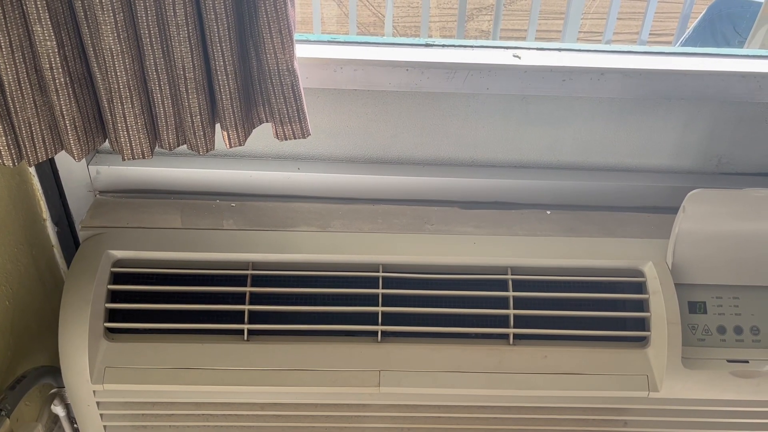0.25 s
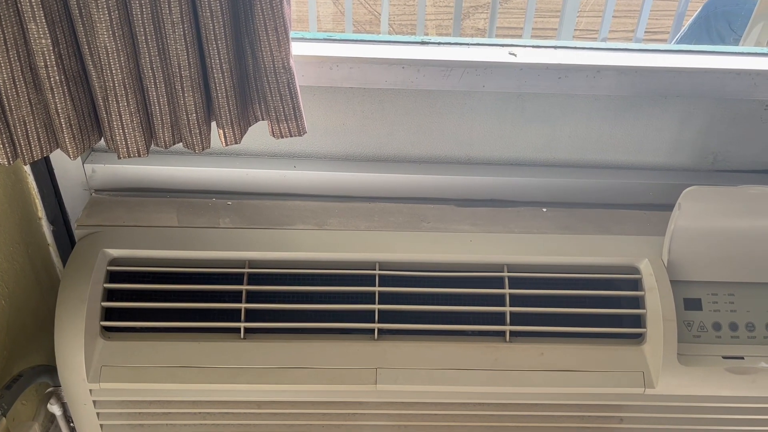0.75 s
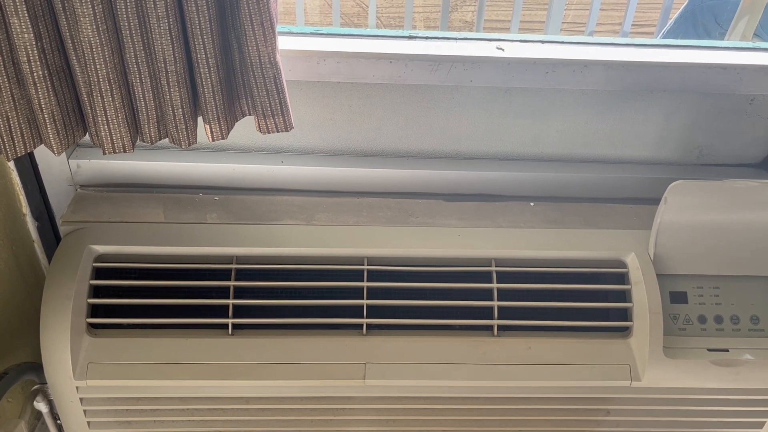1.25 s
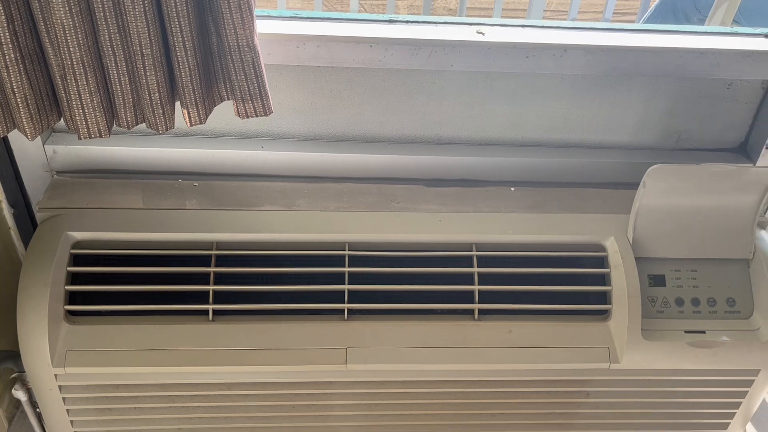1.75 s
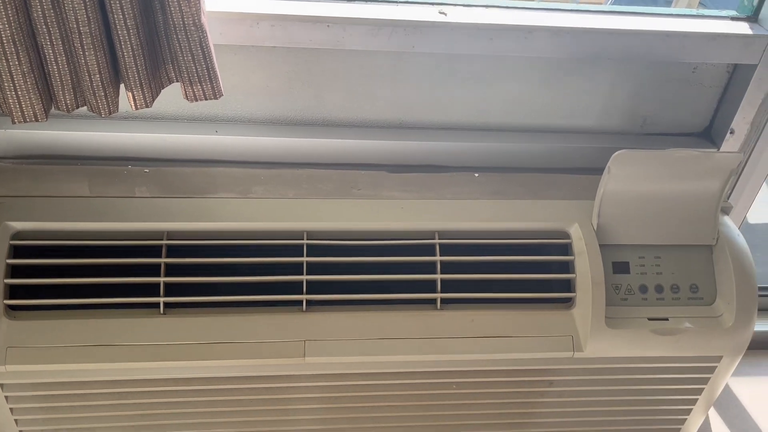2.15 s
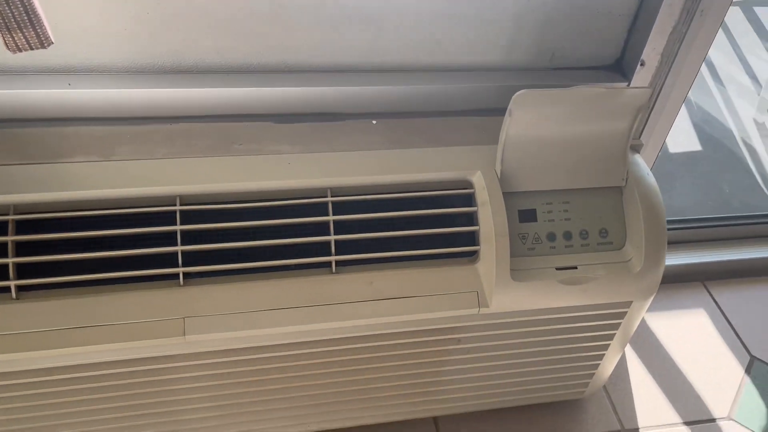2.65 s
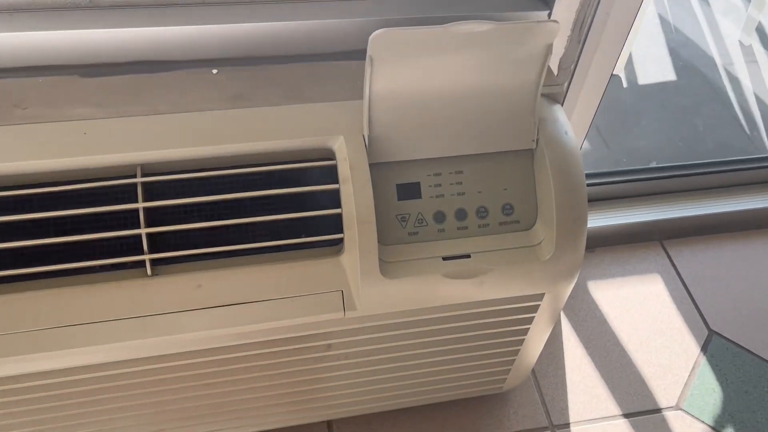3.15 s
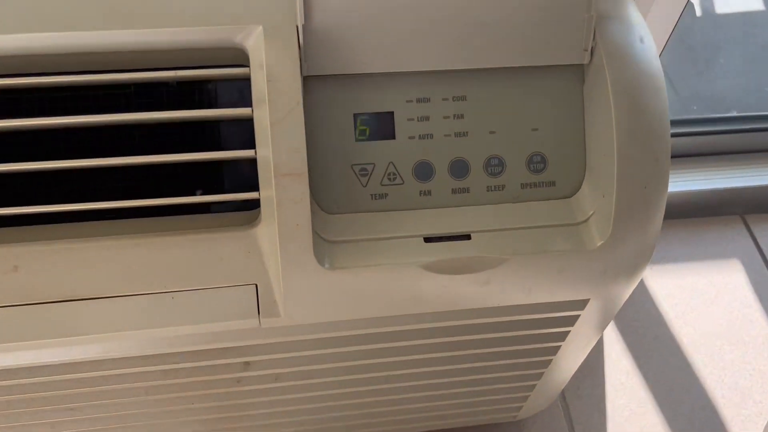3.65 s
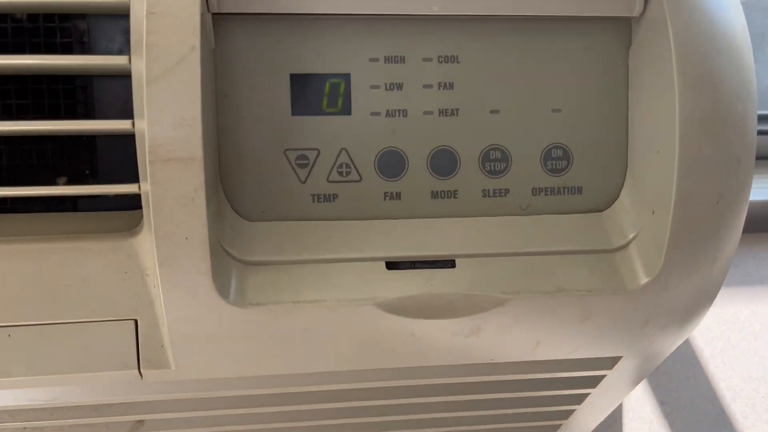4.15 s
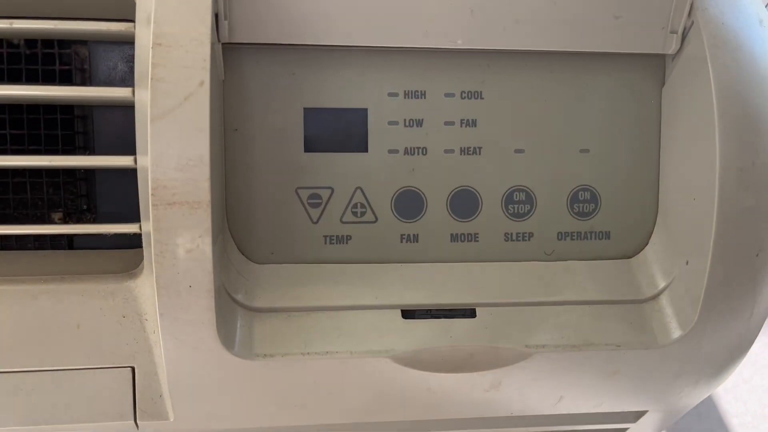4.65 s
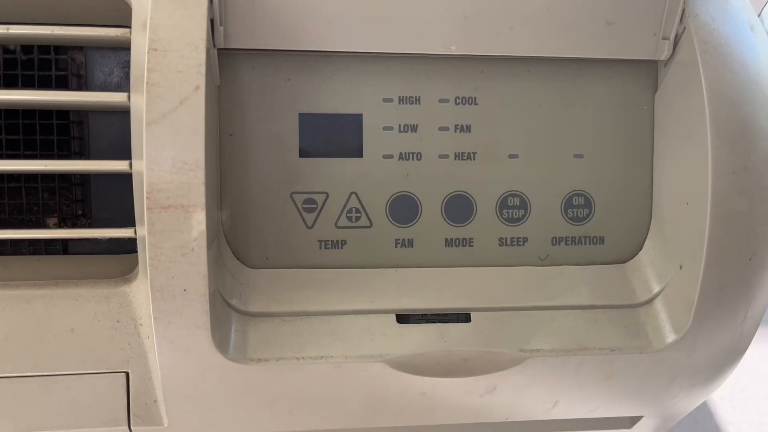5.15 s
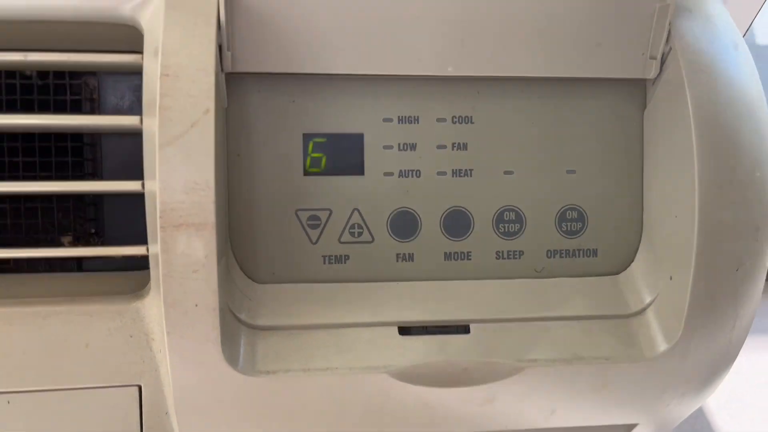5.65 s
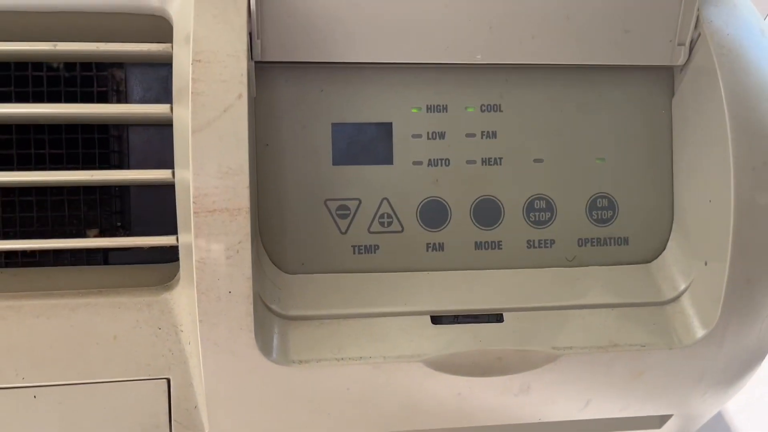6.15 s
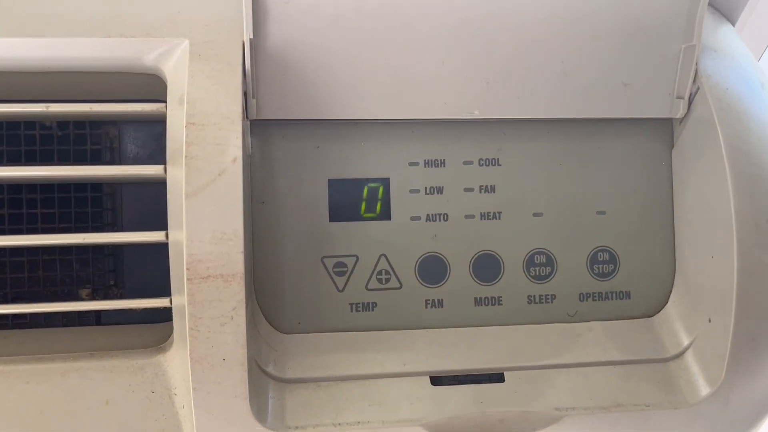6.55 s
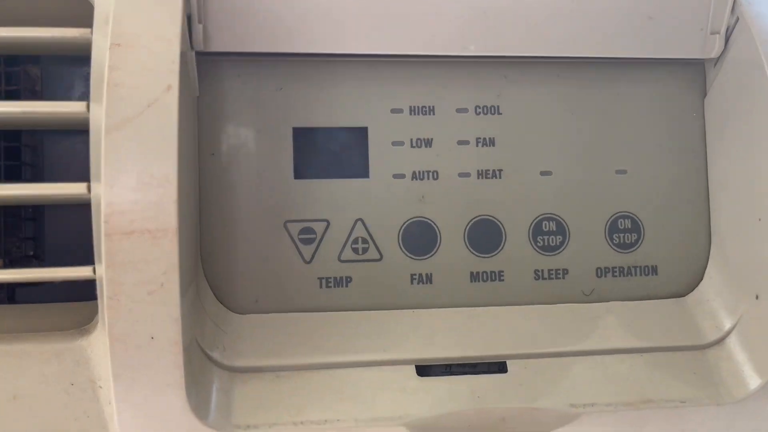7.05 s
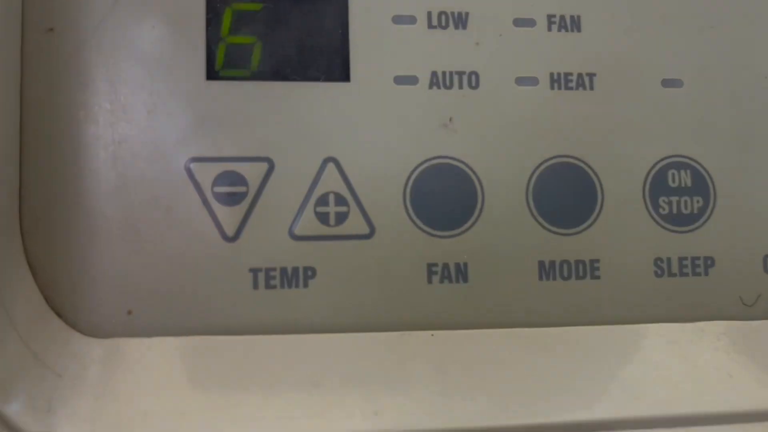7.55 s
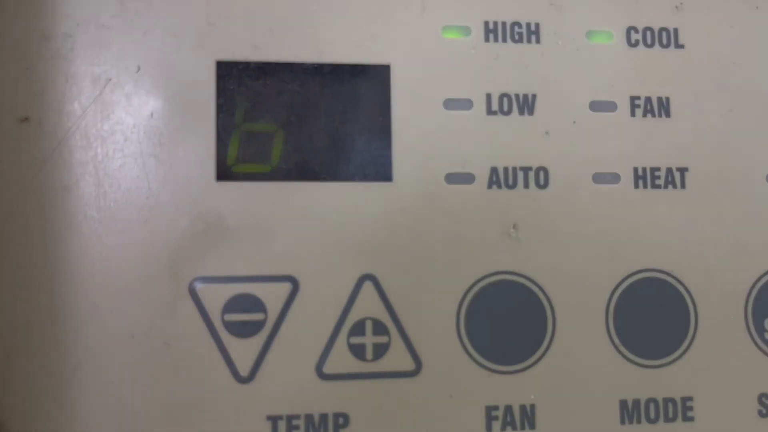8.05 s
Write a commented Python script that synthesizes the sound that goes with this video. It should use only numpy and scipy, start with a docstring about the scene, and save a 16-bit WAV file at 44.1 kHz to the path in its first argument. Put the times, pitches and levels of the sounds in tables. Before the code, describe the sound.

A wall air conditioner hums and blows steadily indoors, then low wind thumps buffet the microphone, a faint buzz appears and the deep hum swells close up.

```python
"""Wall air conditioner, tiled room

A hand-held phone moves from the grille of the running unit to its control panel.
Compressor: partials of the shaft rate, swelling near the casing, and a casing buzz knocked once a turn.
Blower: tones beating against the compressor over shaped-noise rumble; air: noise coloured by duct resonances.
Draught: filtered kicks and low noise buffet the microphone. Grip: noise bursts ring plastic resonances."""
import sys
import numpy as np
from scipy import signal
from scipy.fft import rfft, irfft
from scipy.io import wavfile
from scipy.ndimage import uniform_filter1d

SR = 44100
rng = np.random.default_rng(int(sys.argv[2]) if len(sys.argv) > 2 else 0)


def to_wav(sig):
    """Store sig (one row per channel, or 1-D mono) as 16-bit WAV at the path in sys.argv[1].

    Samples outside -1..1 are clipped; the rate is SR.
    """
    pcm = np.clip(np.atleast_2d(sig), -1, 1) * 32767
    pcm = np.round(pcm).astype(np.int16)
    wavfile.write(sys.argv[1], SR, pcm.T)  # frames by channels


N = 366471

# compressor partials before the hum swell: (multiple of shaft rate, at grille [dB], at panel [dB])
PARTIALS = [(1, -40, -38), (2, -38.5, -50.5), (3, -42, -47), (4, -47, -50.5), (5, -55, -56),
            (6, -63, -53.5), (7, -47, -58), (8, -56, -49.5), (9, -46.5, -54.5), (11, -58, -56),
            (12, -65.5, -57), (13, -65, -76), (14, -59, -66), (15, -69, -79), (17, -68, -57.5),
            (18, -61, -60), (20, -66, -67.5), (21, -73, -86), (24, -65, -108.5), (27, -63.5, -66.5),
            (33, -72.5, -68), (36, -74, -74)]
# blower tones before the hum swell: (multiple of blower rate, at grille [dB], at panel [dB])
BLOWER_TONES = [(1, -38.5, -51.5), (2, -37.5, -54), (2.3, -45, -55.5), (3, -55.5, -49)]
# rushing air, relative to AIR_DB: (frequency [Hz], density at grille [dB], density at panel [dB])
AIR_SPECTRUM = [(198, 1, -4), (315, -10, -5), (526, -7, -6.5), (726, -14, -8.5), (1070, -13.5, -17.5),
                (1380, -16, -16.5), (1876, -24.5, -25), (2790, -29.5, -26), (3330, -31.5, -32),
                (4140, -36.5, -37), (7000, -41, -38.5), (8000, -58, -60), (10300, -69, -52.5),
                (14500, -67, -65.5)]
# outlet duct resonances: (frequency [Hz], width [Hz], lift at panel [dB])
DUCT_MODES = [(696, 20, 3), (1027, 52, 3.5), (2233, 270, 5), (2990, 240, 6.5), (4200, 315, 10),
              (4490, 170, 6), (4950, 140, 7.5), (5900, 170, 1)]
# blower roar, relative to RUMBLE_DB: (frequency [Hz], density [dB])
RUMBLE_SPECTRUM = [(15, -32), (25, -27), (36, -14.5), (54, 2.5), (75, 5), (100, 0.5), (160, -4), (215, -12),
                   (320, -41.5), (700, -63)]
# casing buzz, relative to its timed level: (frequency [Hz], density [dB])
BUZZ_SPECTRUM = [(600, -20), (1500, -5), (2600, -2), (4800, -2), (6000, -6), (7200, -12), (8200, -22),
                 (14500, -34)]
# phone's path: (time [s], nearness to panel [0-1], leaning in to casing [0-1])
PATH = [(0, 0, 0), (1.9, .03, 0.13), (2.6, 0.17, 0.2), (3.3, 0.33, 0.3), (3.6, 0.57, 0.23), (3.95, 0.97, 0),
        (7.25, 1, 0.13), (7.6, 1, 0.88), (8.31, 0.85, 0.93)]
# strong draught buffets: (time [s], flutter peak [dB], flutter top [Hz], thump peak [dB])
BUFFETS = [(2.949, -21, 350, -14.5), (2.981, -17, 294, -10), (3.016, -21, 277, -12), (3.049, -21, 286, -23),
           (3.075, -22, 250, -31), (3.143, -16, 267, -12), (3.185, -30, 200, -23), (3.226, -29, 220, -20),
           (3.256, -11.5, 372, -22), (3.283, -26, 230, -29), (3.333, -16.5, 404, -19),
           (3.348, -21.5, 300, -31), (3.398, -26, 200, -20), (3.42, -18, 400, -25),
           (3.438, -20.5, 400, -17.5), (3.478, -27, 420, -32), (3.503, -29, 300, -23.5),
           (3.531, -21.5, 540, -35), (3.567, -29, 370, -29), (3.655, -29, 300, -23), (3.736, -19, 560, -40),
           (3.787, -23, 340, -29), (3.811, -20.5, 330, -32), (3.83, -27, 430, -28), (3.931, -34, 350, -33),
           (4.083, -26.5, 390, -27), (4.405, -23.5, 422, -25), (4.713, -23, 320, -45),
           (4.758, -28, 350, -32), (4.871, -21.5, 460, -28), (4.907, -33, 250, -26.5),
           (5.008, -22.5, 440, -27), (5.124, -22, 563, -25), (5.259, -33, 300, -28),
           (5.29, -29.5, 400, -41), (5.445, -30, 330, -28), (5.617, -26, 400, -37), (5.735, -25, 380, -30),
           (5.951, -21, 467, -31), (6.067, -21.5, 433, -26), (6.15, -27, 250, -27), (6.23, -31, 280, -29),
           (6.369, -20.5, 458, -35), (6.559, -23.5, 260, -39), (6.592, -22, 480, -43),
           (6.661, -19.5, 534, -28), (6.732, -27, 360, -38), (6.796, -26, 333, -31),
           (6.843, -23.5, 460, -25), (6.923, -30, 420, -28), (7.041, -24.5, 340, -25.5),
           (7.44, -26, 220, -36), (7.525, -25.5, 240, -34), (7.785, -23, 260, -34),
           (8.045, -29, 280, -20.5), (8.17, -27, 261, -27), (8.21, -27, 260, -22), (8.262, -24, 293, -18.5)]
# grip ticks and creaks: (time [s], peak [dB], low edge [Hz], high edge [Hz], decay [s])
TICKS = [(2.369, -47, 8000, 13000, .0006), (2.4097, -19, 2450, 6370, 0.00056),
         (2.4102, -34, 9500, 14000, .0008), (2.411, -21, 450, 1450, .0005),
         (3.136, -41, 9000, 14000, .0007), (3.393, -49, 9000, 13000, .0005),
         (3.41, -36, 9000, 14000, .0005), (5.724, -36, 2500, 7000, 0.0033), (5.7275, -22, 900, 1700, .0013),
         (5.7515, -24, 800, 2300, .0015), (5.7517, -36, 3000, 7000, .0007), (5.755, -31, 1400, 2400, .004),
         (5.767, -31, 1400, 8000, .0015), (5.7872, -20.5, 1150, 9000, 0.0022),
         (5.791, -20.5, 1050, 8000, 0.0037), (5.805, -38, 2500, 5500, .0033),
         (5.809, -26, 500, 900, 0.0013)]
# plastic resonances: (frequency [Hz], width [Hz], level [dB])
PLASTIC_MODES = [(1330, 650, 3), (2550, 850, 0), (3450, 1200, -8), (5150, 1000, -10), (7000, 1500, -17),
                 (11300, 4300, -17)]
# width between the microphone ports: (frequency [Hz], side minus mid [dB])
PORT_WIDTH = [(60, -28), (130, -12), (370, -8.5), (680, -7), (1240, 1.5), (2270, -4), (4160, -5),
              (7600, 7.5), (14000, -12.5)]
# balance of the microphone ports: (frequency [Hz], left minus right [dB])
PORT_BALANCE = [(60, -0.5), (110, 0.5), (200, 2), (370, 0), (680, 5), (1240, -1), (2270, 1), (4160, 4),
                (7610, 0), (14000, -0.5)]
# buzz before beat and restlessness, hidden by the casing until the phone turns: (time [s], density [dB])
BUZZ_LEVEL = [(0, -108), (1.2, -107), (2.15, -104), (2.4, -99), (2.62, -100), (3.15, -95), (3.4, -94.5),
              (3.8, -93), (4.03, -96.5), (4.3, -92.5), (4.55, -95), (4.95, -92), (5.14, -99), (5.45, -93.5),
              (6.3, -96.5), (6.8, -94.5), (7.12, -100), (7.45, -91.5), (7.75, -98), (8.31, -92.5)]
# sweeps through the hissing jet edge: (time [s], half length [s], peak density [dB])
SWEEPS = [(2.548, 0.44, -96.5), (3.714, 0.25, -95), (7.47, 0.085, -89)]
# draught force on the microphone: (time [s], force [dB])
DRAUGHT_FORCE = [(0, -25), (1.1, -19.5), (1.3, -3), (1.55, -20.5), (2.87, -13), (2.98, 2), (3.55, -6),
                 (4.2, -15.5), (4.8, -11), (6.75, -5.5), (7.2, -17), (7.45, -11.5), (8.0, -2.5), (8.3, 0.5)]
# fingers brushing the grip: (time [s], half length [s], peak density [dB])
BRUSHES = [(2.395, .05, -105), (3.155, 0.1, -106), (3.48, 0.038, -89.5)]

TIME, FREQS = np.arange(N) / SR, np.arange(N // 2 + 1) * SR / N  # [s], [Hz]
SIDES = np.array([[1], [-1]])  # left, right

SHAFT_HZ, BLOWER_HZ, TOP_HZ = 58.47, 66.5, 13900
HUM_GRILLE_DB, HUM_PANEL_DB, HUM_LEAN_DB = 1, -6, 16.5
# tenth partial rings the casing; its standing wave has one node on the way
WHINE_GRILLE_DB, WHINE_PANEL_DB, WHINE_LEAN_DB = -35, -39, 2.5
NODE_AT, NODE_WIDTH = 0.31, 0.44  # in nearness
KNOCK_AT_TURN, BEAT_HZ, BEAT_PEAK_S = 0.325, 8.3, 0.041
BEAT_DB, KNOCK_SCATTER_DB = 3, 3
TICK_DECAY_S, RATTLE_RISE_S, RATTLE_DECAY_S = 0.0012, 0.0011, 0.0044
FIZZ_DB, FIZZ_TICK_DB = -17.5, 14  # fizz against the buzz; tick gain within the fizz
RUMBLE_DB, RUMBLE_DB_PER_HUM_DB = -61, 0.27
AIR_DB = -62
SING_FROM_S, SING_TO_S, SING_FADE_S, SING_DB = 2.17, 7.34, 0.077, -71.5
CHURN_DB, HEAVE_DB, HEAVE_DB_PER_FORCE_DB = -59, -48, 1.72  # densities at 0 dB force
STRAY_COUNT, STRAY_FLUTTER_DB, STRAY_THUMP_DB, STRAY_TOP_HZ = 36, -34, -41, 310
EDDY_LAG_CYCLES, EDDY_WAKE, EDDY_WAKE_S = 1.3, 0.64, 0.012  # delay in cycles; wake against kick; decay
THUMP_LOW_HZ, THUMP_TOP_HZ, FLUTTER_LOW_HZ = 42.7, 102, 156


def undb(db):
    """Decibels to gain."""
    return 10 ** (np.asarray(db) / 20)


def curves(table):
    """Columns of a timed table, interpolated to every sample."""
    time_s, *columns = np.transpose(table)
    return [np.interp(TIME, time_s, column) for column in columns]


def spectrum(table, axis=1):
    """One column of a frequency table on every bin, interpolated in log frequency."""
    table = np.array(table)
    return np.interp(np.log(FREQS + 1), np.log(table[:, 0]), table[:, axis])


def walk(rate_hz):
    """Random levels held 1 / rate_hz seconds, smoothed twice, scaled to unit spread."""
    hold = int(SR / rate_hz)
    steps = np.repeat(rng.standard_normal(N // hold + 1), hold)
    smooth = uniform_filter1d(uniform_filter1d(steps, hold), hold)[:N]
    return smooth / smooth.std()


def noise(density_db, locked=0.51):
    """Two-port noise [dB per Hz]: alike in the deep bass; above, partly unrelated, partly earlier on the left."""
    mid, side = rfft(rng.standard_normal((2, N)))
    side = 1j * locked * mid + np.sqrt(1 - locked ** 2) * side
    width = undb(spectrum(PORT_WIDTH))
    ports = (mid + SIDES * width * side) / np.sqrt(1 + width ** 2)
    ports = ports * undb(SIDES * spectrum(PORT_BALANCE) / 2)
    return irfft(ports * undb(density_db), N) * np.sqrt(SR / 2)


def passband(f_hz, lo_hz, hi_hz, order=5):
    """Band-pass gain at the given frequencies."""
    low_edge = 1 + (lo_hz / f_hz) ** (2 * order)
    high_edge = 1 + (f_hz / hi_hz) ** (2 * order)
    return (low_edge * high_edge) ** -0.5


def band(lo_hz, hi_hz, order=3):
    """Band-pass slopes [dB] on every bin."""
    low_edge = 1 + (lo_hz / (FREQS + 1)) ** (2 * order)
    high_edge = 1 + (FREQS / hi_hz) ** (2 * order)
    return -10 * np.log10(low_edge * high_edge)


def tone(phase, hz, db, waver_db, spread_hz=1100):
    """Sine of wavering level; its phase differs more between the ports the higher it is, up to a limit."""
    lag_rad = min(hz / spread_hz, 1.5) * rng.choice([-1, 1]) / 2
    offset_rad = rng.uniform(0, 2 * np.pi) * (hz > BLOWER_HZ)  # random for overtones only
    angle = (phase + offset_rad) % (2 * np.pi) + SIDES * lag_rad
    level = np.sqrt(2) * undb(db + waver_db * walk(2.6))
    return level * np.sin(angle.astype(np.float32))


def grip(snap=1.0, tail_db=-36, tail_s=0.0135, size=4096):
    """Slips of the fingers ring the plastic modes as ticks and creaks; brushing is high band noise."""
    brushing = sum(undb(db) * np.exp(-((TIME - s) / half_s) ** 4) for s, half_s, db in BRUSHES)
    out = noise(band(8500, 13500, order=4)) * brushing
    f_hz, t = np.arange(size // 2 + 1) * SR / size + 1, TIME[:size]
    body = 0
    for k, (hz, width_hz, db) in enumerate(PLASTIC_MODES):
        body = body + (-1) ** k * undb(db) / (1 + 1j * (f_hz ** 2 - hz ** 2) / (width_hz * f_hz))
    lead = size // 16
    for s, db, lo_hz, hi_hz, decay_s in TICKS:
        decay = np.exp(-t / decay_s) + undb(tail_db) * np.exp(-t / tail_s)
        slip = rng.standard_normal(size) * decay
        clean_snap = snap * np.exp(-decay_s / 0.0073) * (t == 0)  # stronger for quick slips
        slip = slip / np.linalg.norm(slip) + clean_snap
        tick = irfft(rfft(np.roll(slip, lead)) * body * passband(f_hz, lo_hz, hi_hz, order=4))
        tick *= undb(db) / abs(tick).max()
        start = int(s * SR) - lead
        out[:, start:start + size] += np.array([tick, 0.65 * np.roll(tick, 2)])  # right: weaker, later
    return out


def eddy(flutter_db, top_hz, thump_db, width=0.12, size=8192):
    """Pressure kick with a ragged wake, from its middle on; lows come late: flutter falls to thump."""
    f_hz, t = np.arange(size // 2 + 1) * SR / size + 1, TIME[:size] - TIME[size // 2]
    wake = rng.standard_normal((2, size)) * np.exp(-abs(t) / EDDY_WAKE_S) * (t > 0)
    wake, side = wake / np.linalg.norm(wake[0])
    kick = rfft((t == 0) + EDDY_WAKE * wake + SIDES * width * side)
    turns = rng.random() - EDDY_LAG_CYCLES * np.log(f_hz)  # group delay: EDDY_LAG_CYCLES / f
    kick = kick * np.exp(2j * np.pi * turns)
    flutter = irfft(kick * passband(f_hz, FLUTTER_LOW_HZ, top_hz, order=7) / np.sqrt(f_hz))
    thump = irfft(kick * passband(f_hz, THUMP_LOW_HZ, THUMP_TOP_HZ, order=4))
    return undb(flutter_db) * flutter / abs(flutter).max() + undb(thump_db) * thump / abs(thump).max()


def stray_eddies(from_s=3.0, spread_octaves=0.42):
    """Small eddies at random moments and pitches, as rows like BUFFETS."""
    at, pitch = rng.uniform(-1, 1, (2, STRAY_COUNT))
    times_s = np.interp(at, [-1, 1], [from_s, TIME[-1]])
    tops_hz = STRAY_TOP_HZ * 2 ** (spread_octaves * pitch)
    return [(s, STRAY_FLUTTER_DB, top_hz, STRAY_THUMP_DB) for s, top_hz in zip(times_s, tops_hz)]


def draught():
    """Eddies hit the microphone over churn and deep heave, both noise driven by the draught force."""
    force_db, = curves(DRAUGHT_FORCE)
    churn = noise(band(170, 267, order=6)) * undb(CHURN_DB + force_db + 2.2 * walk(22))
    heave_db = HEAVE_DB + HEAVE_DB_PER_FORCE_DB * force_db + 2.0 * walk(14)
    heave = noise(band(42, 136, order=6)) * undb(heave_db)
    out = np.zeros((2, N + 2 * SR))  # 1 s spare at each end
    for s, flutter_db, top_hz, thump_db in [*BUFFETS, *stray_eddies()]:
        swell = eddy(flutter_db, top_hz, thump_db)
        start = SR + int(s * SR) - swell.shape[1] // 2
        out[:, start:start + swell.shape[1]] += swell
    return out[:, SR:SR + N] + churn + heave


def outlet():
    """Louvres sing (narrow noise) in line with the jet; the jet edge hisses at each sweep through it."""
    in_line = (1 + np.tanh(np.minimum(TIME - SING_FROM_S, SING_TO_S - TIME) / SING_FADE_S)) / 2
    singing = noise(band(904, 1024, order=6)) * undb(SING_DB) * in_line
    edge = sum(undb(db) / (1 + ((TIME - s) / half_s) ** 2) for s, half_s, db in SWEEPS)
    return singing + noise(band(1700, 4100, order=3)) * edge


def air(near, lean, lean_db=2.5, ripple_db=3):
    """Turbulence noise coloured by duct modes, lifted in narrow bands at multiples of the shaft rate."""
    duct_db = sum(db / (1 + (2 * (FREQS - hz) / width_hz) ** 2) for hz, width_hz, db in DUCT_MODES)
    multiple = np.rint(FREQS / SHAFT_HZ).astype(int)
    lift = np.minimum(rng.exponential(size=multiple.max() + 1), 3)
    lift_db = ripple_db * lift[multiple] * (FREQS > 900)
    partials_db = lift_db * np.exp(-((FREQS - multiple * SHAFT_HZ) / 7.2) ** 2)
    colour_db = band(170, SR, order=2) + partials_db
    grille_db = spectrum(AIR_SPECTRUM, axis=1) + 0.27 * duct_db + band(180, SR, order=4)
    panel_db = spectrum(AIR_SPECTRUM, axis=2) + duct_db
    grille, panel = noise(grille_db + colour_db), noise(panel_db + colour_db)
    flutter_db = 0.9 * walk(9) + 0.76 * walk(30)
    blend = np.sqrt(1 - near) * grille + np.sqrt(near) * panel
    return blend * undb(AIR_DB + lean * lean_db + flutter_db)


def reflect(x, near, far_s=0.0028, close_s=0.001058, sway=0.052, share=0.09):
    """Casing echo: its delay shortens towards the panel and sways, so the comb colour sweeps."""
    delay_s = far_s + uniform_filter1d(near, SR // 2) * (close_s - far_s)
    delay_s = delay_s * (1 + sway * walk(0.94))
    return x + share * np.array([np.interp(TIME - delay_s, TIME, port) for port in x])


def blower(near, hum_db):
    """Blade tones with slight phase wander, beating against the compressor, over restless low roar."""
    roar_db = RUMBLE_DB + RUMBLE_DB_PER_HUM_DB * hum_db + 0.73 * walk(9.6)
    out = noise(spectrum(RUMBLE_SPECTRUM)) * undb(roar_db)
    for k, grille_db, panel_db in BLOWER_TONES:
        hz = k * BLOWER_HZ
        phase = 2 * np.pi * hz * TIME + 0.13 * k ** 2 * walk(9)
        db = grille_db + near * (panel_db - grille_db) + 0.74 * hum_db
        out = out + tone(phase, hz, db, waver_db=1.1)
    return out


def buzz(turn, restless_db=1.9, tick_db=3):
    """Loose panel knocked once a turn: bright tick, then rattle, swelling at BEAT_HZ, with high fizz."""
    knock, since_turns = np.divmod(turn / (2 * np.pi) - KNOCK_AT_TURN + 1, 1)
    knock, since_s = knock.astype(int), since_turns / SHAFT_HZ
    strength = np.clip(rng.standard_normal(knock.max() + 1), -2, 1.5)[knock]
    tick = np.exp(-since_s / TICK_DECAY_S) * undb(KNOCK_SCATTER_DB * strength)
    rattle = np.exp(-since_s / RATTLE_DECAY_S) - np.exp(-since_s / RATTLE_RISE_S)
    rattle = rattle / np.sqrt(np.mean(rattle ** 2))
    panel = noise(spectrum(BUZZ_SPECTRUM)) * (rattle + undb(tick_db) * tick)
    fizz = noise(band(9500, 12900, order=9)) * undb(FIZZ_DB) * (1 + undb(FIZZ_TICK_DB) * tick)
    level_db, = curves(BUZZ_LEVEL)
    beat_db = BEAT_DB * np.cos(2 * np.pi * BEAT_HZ * (TIME - BEAT_PEAK_S))
    return (panel + fizz) * undb(level_db + beat_db + restless_db * np.tanh(walk(13)))


def compressor(turn, near, lean, hum_db):
    """Shaft-rate partials, the lowest following the hum most; the tenth whines and fades at its node."""
    whine_db = WHINE_GRILLE_DB + near * (WHINE_PANEL_DB - WHINE_GRILLE_DB) + lean * WHINE_LEAN_DB
    standing = np.tanh((near - NODE_AT) / NODE_WIDTH)
    whine = tone(10 * turn, 10 * SHAFT_HZ, whine_db + SIDES * 0.33, waver_db=0.0, spread_hz=1080)
    out = standing * whine
    for k, grille_db, panel_db in PARTIALS:
        db = grille_db + near * (panel_db - grille_db) + hum_db / k ** 0.48
        out = out + tone(k * turn, k * SHAFT_HZ, db, waver_db=min(1.1 + 0.15 * k, 2.5))
    return out


def scene():
    """Running unit as heard along the phone's path."""
    near, lean = curves(PATH)
    hum_db = HUM_GRILLE_DB + near * (HUM_PANEL_DB - HUM_GRILLE_DB) + lean * HUM_LEAN_DB
    turn = 2 * np.pi * SHAFT_HZ * TIME + 0.017 * walk(1.98)  # shaft angle [rad], slight wander
    handling = draught() + grip()
    airflow = reflect(air(near, lean) + outlet(), near)
    machine = blower(near, hum_db) + buzz(turn) + compressor(turn, near, lean, hum_db)
    return handling + airflow + machine


def record(dry):
    """A 4 ms fade-in at the start, then the phone's steep elliptic low-pass at TOP_HZ."""
    dry = dry * np.minimum(TIME / 0.004, 1)
    return signal.sosfilt(signal.ellip(8, 0.2, 70, TOP_HZ, fs=SR, output="sos"), dry)


dry = scene()
out = record(dry)
to_wav(out)
```